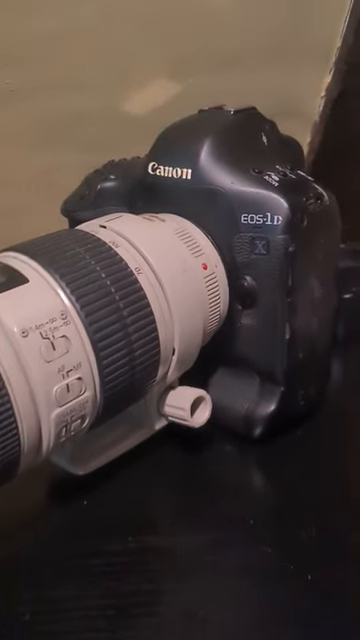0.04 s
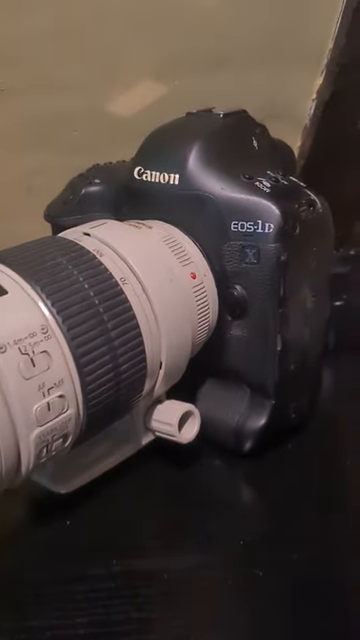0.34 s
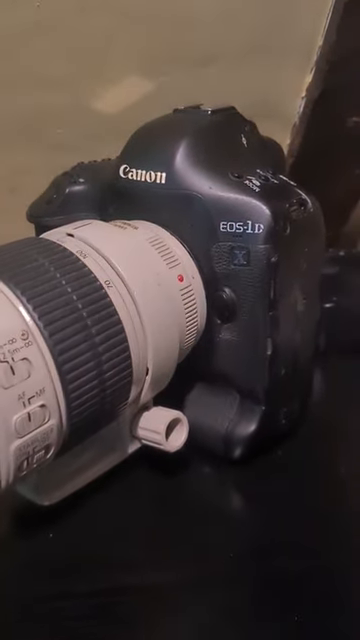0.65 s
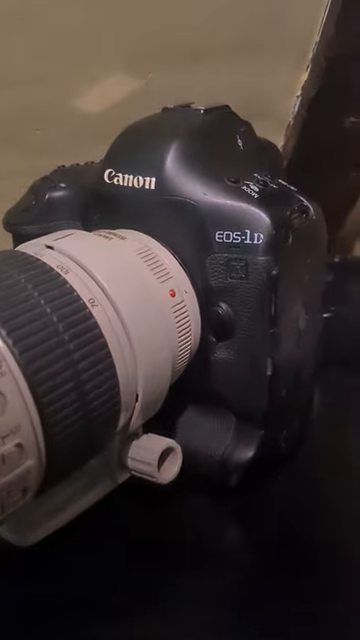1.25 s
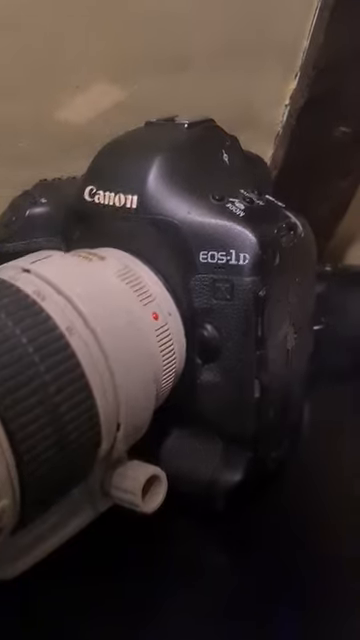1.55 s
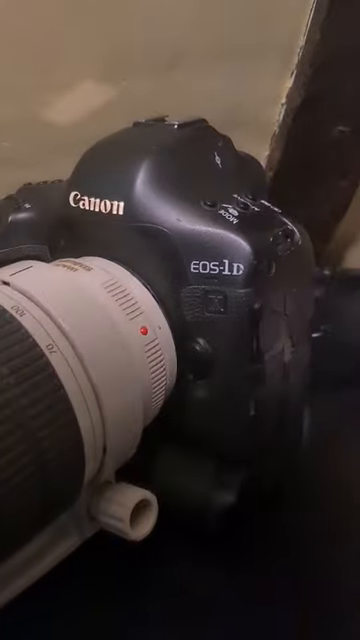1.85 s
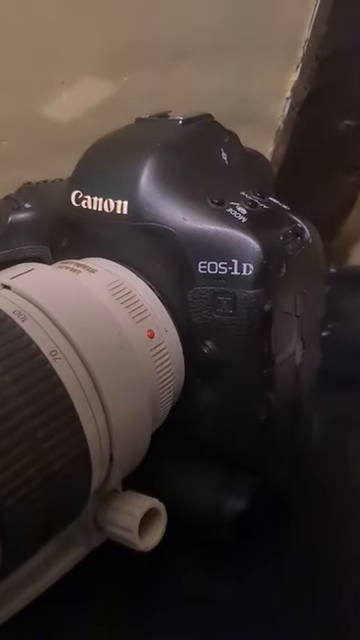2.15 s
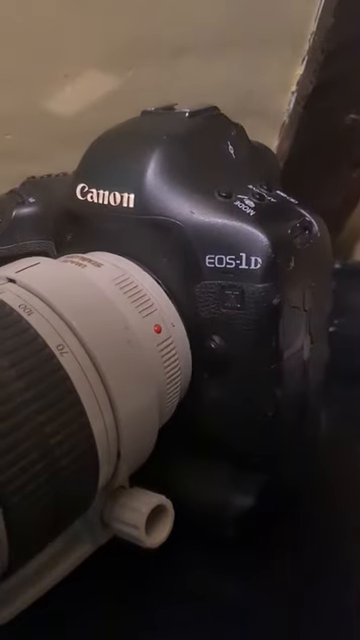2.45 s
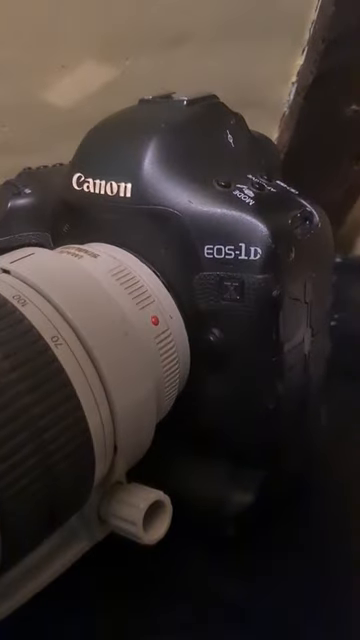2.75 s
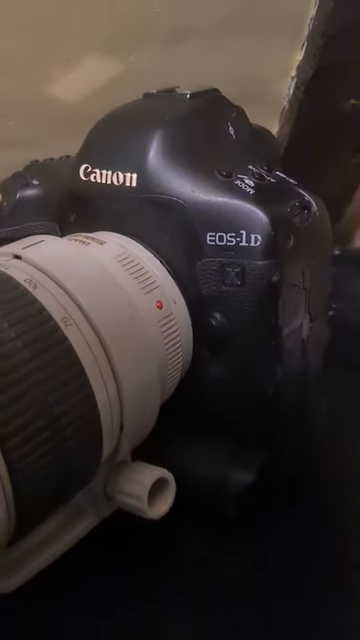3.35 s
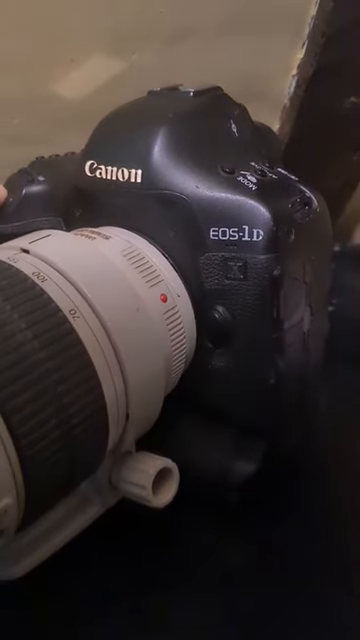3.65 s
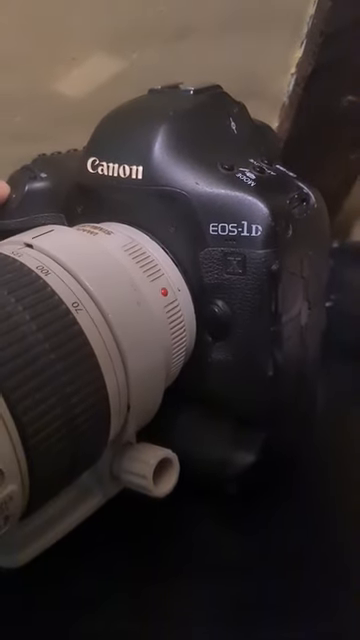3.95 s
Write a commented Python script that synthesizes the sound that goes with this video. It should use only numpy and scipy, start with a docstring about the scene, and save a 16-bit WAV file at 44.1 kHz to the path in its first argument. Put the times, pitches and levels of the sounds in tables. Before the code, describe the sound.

A camera shutter clatters in a rapid continuous burst, close to the microphone. Before it, a quiet room holds only soft ventilation noise and faint hum; then the crisp, evenly spaced clicks run on to the end.

```python
"""Quiet room, ventilation noise and hum. Close by, a reflex camera on a table fires about 10 frames/s.
Each frame is one chain of mirror, shutter and cocking contacts, each a short rattle of the body;
springs and levers ring, and the mirror's weight thumps the body against the table.
Faint handling rustles, a double tick and the release click come first; the first exposure is longer."""
import sys
import numpy as np
from scipy import signal
from scipy.fft import rfft, irfft
from scipy.io import wavfile
from scipy.ndimage import uniform_filter1d

SR = 44100
rng = np.random.default_rng(int(sys.argv[2]) if len(sys.argv) > 2 else 0)


def generate_wav(sig):
    """Save sig (samples, or channels by samples) to the path in sys.argv[1] as 16-bit PCM at SR."""
    pcm = np.round(np.clip(np.atleast_2d(sig).T, -1, 1) * 32767).astype(np.int16)
    wavfile.write(sys.argv[1], SR, pcm)


N = 176400
EVENT_SAMPLES = 8192
FIRST_OPEN_S, FIRST_CLOSE_S = 2.9918, 3.0435
BURST_START_S, FRAME_S, OPEN_TO_CLOSE_S = 3.1268, .09502, .0318

# ventilation noise (frequency [Hz], density [dB])
AIR_SPECTRUM = [(20, -12), (36, -17), (48, 1), (62, -4), (100, -5), (135, 1), (185, -8), (245, -4.5),
                (290, -13), (700, -12), (1000, -18.5), (1400, -18), (2400, -29.5), (5500, -39),
                (6400, -29.5), (7300, -35), (8700, -57.5), (10000, -46), (15000, -46.5)]
# room noise (frequency [Hz], left-right correlation [-1..1])
AIR_CORRELATION = [(60, 0.98), (180, 0.96), (550, 0.34), (1650, -0.12), (4970, 0.21), (15000, 0.1)]
# hum lines (frequency [Hz])
HUM_LINES_HZ = [209.9, 349.9, 845.2]
# hum lines (start level [dB], end level [dB])
HUM_LEVELS_DB = [(-64, -62), (-70, -72.5), (-82, -67)]
# handling rustles (peak time [s], level [dB], 1/e half-width [s])
RUSTLE_SWELLS = [(1.9, -79, .05), (2.1, -78, .12), (2.48, -79, .025), (2.73, -78, .045)]
# friction noise (frequency [Hz], density [dB])
RUSTLE_SPECTRUM = [(1500, -12), (4000, 2), (7000, -14), (12000, -20)]
# camera noise (frequency [Hz], left-right correlation [-1..1])
CAMERA_CORRELATION = [(130, 0.98), (330, -0.13), (600, 0.89), (1200, -0.038), (3000, -0.021),
                      (12000, 0.011)]
# body response (frequency [Hz], density [dB])
BODY_SPECTRUM = [(38, -43), (80, -5.5), (140, -6), (300, -6), (440, -9.5), (600, -4.5), (720, -5),
                 (950, -6.5), (1300, -2), (1600, -3.5), (2100, -1), (2900, 0), (3550, -2), (4400, 0),
                 (5200, -6.5), (7200, -6), (9300, -16.5), (12500, -10.5), (15500, -16)]
# housing resonances (frequency [Hz], boost [dB], width [Hz])
HOUSING_MODES = [(567, 5.5, 58), (786, 6, 28), (842, 5.5, 25), (1072, 7.5, 38), (1222, 5, 49),
                 (1334, 7, 24), (1405, 3.5, 16), (2920, 4.5, 66), (3920, 5.5, 29), (4700, 5, 50),
                 (5810, 4.5, 99), (7060, 3, 83)]
# rattle power common to all frames (frequency [Hz], share [0..1])
REPEAT_SHARE = [(300, 0.96), (700, 0.92), (1300, 0.85), (3500, .65), (7000, 0.42), (13000, .15)]
# rattle balance (frequency [Hz], left over right [dB])
RATTLE_PAN = [(200, 1.5), (380, -8.5), (700, -0.5), (1200, -7), (2400, -2), (4000, -1.8), (5800, -1.5),
              (7700, 3.5), (11000, -.5)]
# room tail at its start (frequency [Hz], relative level [dB])
TAIL_SPECTRUM = [(200, -20), (700, -13.5), (1500, -15), (4000, -15.5), (12000, -21)]
# double tick and release (time [s], level [dB], decay [s], bass [dB], treble [dB])
SINGLE_CLICKS = [(1.934, -65, .006, -10, 9), (1.952, -67, .01, -8, 5), (2.9672, -32, 0.0074, 10.5, 3)]
# small parts rung by those clicks (time [s], pitch [Hz], level [dB], swell [s])
CLICK_PINGS = [(1.934, 6255, -66, .004), (1.934, 4780, -73, .007), (1.949, 6255, -66, 0.0055),
               (2.968, 4200, -43, 0.0047)]
# contacts per frame (name, stroke, delay [s], level [dB], decay [s], bass [dB], treble [dB])
FRAME_CONTACTS = [ ("mirror unlatches", "open", -0.0037, -33.5, .004, 0, 1),
                  ("mirror lifts", "open", 0.0, -12.5, 0.0047, -1.7, -1.3),
                  ("lever rebounds", "open", .007, -21, 0.0088, 0, -5.5),
                  ("mirror lands", "open", .0178, -18.5, 0.0059, 0.89, -1.5),
                  ("shutter unlatches", "close", -.003, -23.5, 0.0045, 0, 0),
                  ("shutter runs", "close", .0003, -13.5, 0.0046, -2, -0.45),
                  ("shutter bounces", "close", .008, -19.5, 0.0043, 0, 5.3),
                  ("gears turn", "close", .0125, -22.5, 0.0087, -1.2, 0.5),
                  ("mirror drops", "close", .0182, -12, 0.0035, 0, 1.8),
                  ("mirror bounces", "close", .0222, -16, 0.0055, -1.8, 6),
                  ("cam turns", "close", .033, -24, 0.013, 0, -2),
                  ("shutter cocks", "close", .0418, -17, 0.0053, -0.44, 0),
                  ("pawl slips", "close", .0465, -22.5, 0.0036, 0, 2.6),
                  ("latch catches", "close", .0505, -18, 0.004, -0.7, -1.5)]
# ringing parts per frame (stroke, delay [s], pitch [Hz], level [dB], swell [s], left over right [dB])
FRAME_RINGS = [ ("open", -.0012, 580, -26.5, 0.0031, 0), ("open", 0.0, 3911, -22, 0.0016, 8.2),
               ("open", .0006, 3040, -28, 0.0015, -1), ("open", .0007, 2650, -27.5, 0.001, 8),
               ("open", 0.0031, 221, -24.5, 0.0021, 1), ("open", .0172, 1400, -31, 0.0052, 1),
               ("open", 0.01746, 221.6, -20.5, 0.0034, 2.8), ("open", .0178, 772, -24, 0.0015, -6),
               ("open", .0197, 331, -29, 0.009, -9), ("open", 0.0214, 81, -31.5, 0.0053, 0),
               ("open", .0352, 157, -21.5, 0.002, 1), ("close", -0.000077, 1316, -23, 0.0021, -14.5),
               ("close", 0.0, 3323, -25, 0.0019, -17.5), ("close", -.0005, 2941, -28.5, 0.0041, -13),
               ("close", 0.0, 4735, -27.5, 0.0032, 0), ("close", .0176, 4700, -26, .0018, -2),
               ("close", .0183, 816, -26, 0.0022, 0), ("close", .051, 1234, -27, 0.0039, -13.5),
               ("close", .0421, 2010, -25, 0.0018, -10.5), ("close", .0475, 221, -28.5, 0.0039, 1),
               ("close", .0507, 1075, -33.5, 0.007, -15)]


def from_db(db):
    return 10 ** (np.asarray(db) / 20)


def rms_one(x):
    return x / np.sqrt(np.mean(x ** 2) + 1e-20)


def at_bins(points, size):
    """Table interpolated over log frequency at the FFT bins."""
    hz, value = np.transpose(points)
    return np.interp(np.log(np.fft.rfftfreq(size, 1 / SR) + 1), np.log(hz), value)


def pan(db):
    return from_db(np.array([[.5], [-.5]]) * db)


def highpass(x, hz):
    return signal.sosfilt(signal.butter(2, hz, "high", fs=SR, output="sos"), x)


def minimum_phase(gain):
    """Causal filter spectrum with this gain."""
    cepstrum = irfft(np.log(gain + 1e-12))
    size = cepstrum.shape[-1]
    fold = 1 + np.sign(size / 2 - np.arange(size)) - (np.arange(size) == 0)
    return np.exp(rfft(cepstrum * fold))


def stereo_noise(correlation, count, size):
    """White noise spectra with the given left-right correlation."""
    alike = np.clip(at_bins(correlation, size), -.99, .99)
    mid, side = rfft(rng.standard_normal((2, count, 1, size)))
    return (np.sqrt(1 + alike) * mid + np.sqrt(1 - alike) * side * [[1], [-1]]) / np.sqrt(2)


def drift(hz):
    """Slow random curve through unit-variance knots."""
    knots = rng.standard_normal(int(N / SR * 100))
    return np.interp(np.arange(N) / SR * hz, np.arange(len(knots)), knots)


def add(out, time_s, sound):
    start = int(time_s * SR)
    if start < N:
        out[:, start:start + sound.shape[-1]] += sound[..., :N - start]


def ventilation(air_db=-55, hiss_db=-87, hiss_hz=6380, half_width_hz=120):
    """Dull air noise with a thin band of hiss."""
    air_noise, hiss_noise = stereo_noise(AIR_CORRELATION, count=2, size=N)
    air = rms_one(irfft(air_noise * from_db(at_bins(AIR_SPECTRUM, N))))
    detuning = (np.fft.rfftfreq(N, 1 / SR) - hiss_hz) / half_width_hz
    hiss = rms_one(irfft(hiss_noise / (1 + detuning ** 2)))
    return from_db(air_db) * air + from_db(hiss_db) * hiss


def hum(waver=.28, waver_hz=5.85):
    """Three tones wavering in level and phase."""
    t, out = np.arange(N) / SR, np.zeros(N)
    for hz, (start_db, end_db) in zip(HUM_LINES_HZ, HUM_LEVELS_DB):
        amplitude = 1 + waver * drift(waver_hz)
        phase_rad = 2 * np.pi * hz * t + waver * drift(waver_hz)
        out += from_db(np.linspace(start_db, end_db, N)) * rms_one(amplitude * np.sin(phase_rad))
    return out


def rustles():
    """Handling: faint swells of friction noise."""
    t = np.arange(N) / SR
    swells = sum(from_db(level_db) * np.exp(-((t - peak_s) / half_width_s) ** 2)
                 for peak_s, level_db, half_width_s in RUSTLE_SWELLS)
    noise = stereo_noise(CAMERA_CORRELATION, count=1, size=N)[0]
    return swells * rms_one(irfft(noise * from_db(at_bins(RUSTLE_SPECTRUM, N))))


def body_response(bass_db, treble_db):
    """Stereo gain of the body and its housing modes, tilted per contact."""
    bins_hz = np.fft.rfftfreq(EVENT_SAMPLES, 1 / SR)
    housing = 1 + sum((from_db(boost_db) - 1) / (1 + 2j * (bins_hz - hz) / width_hz)
                      for hz, boost_db, width_hz in HOUSING_MODES)
    body = rms_one(from_db(at_bins(BODY_SPECTRUM, EVENT_SAMPLES)) * np.abs(housing))
    tilt_db = at_bins([(590, bass_db), (3020, 0), (9300, treble_db)], EVENT_SAMPLES)
    return body * from_db(tilt_db) * pan(at_bins(RATTLE_PAN, EVENT_SAMPLES))


def rattles(level_db, decay_s, bass_db, treble_db, count, attack_s, hold_s=.0012, room_t60_s=.24):
    """Repeats of one contact: dense, fast-dying body modes plus room tail. Treble varies most."""
    t = np.arange(EVENT_SAMPLES) / SR
    noise = stereo_noise(CAMERA_CORRELATION, count + 1, EVENT_SAMPLES)
    share = at_bins(REPEAT_SHARE, EVENT_SAMPLES)
    modes = np.sqrt(share) * noise[0] + np.sqrt(1 - share) * noise[1:]
    envelope = (1 - np.exp(-t / attack_s)) * np.exp(-np.maximum(t - hold_s, 0) / decay_s)
    direct = rfft(irfft(modes) * envelope)
    power = uniform_filter1d(np.mean(np.abs(direct) ** 2, axis=0), size=90) / np.sum(envelope ** 2)
    direct *= minimum_phase(power ** -.5)   # flattens chance peaks
    tail_noise = irfft(modes * from_db(at_bins(TAIL_SPECTRUM, EVENT_SAMPLES)))[..., ::-1]
    tail = tail_noise * (1 - np.exp(-t / decay_s)) * from_db(-60 * t / room_t60_s)
    gain = from_db(level_db) * body_response(bass_db, treble_db)
    return irfft((direct + rfft(tail)) * minimum_phase(gain))


def ring(hz, level_db, swell_s):
    """One mode; peaks at swell_s, then dies."""
    t = np.arange(EVENT_SAMPLES) / SR
    envelope = t / swell_s * np.exp(1 - t / swell_s)
    return from_db(level_db) * envelope * np.sin(2 * np.pi * hz * t)


def clicks():
    """Faint double tick, then the release; small parts ping with them."""
    out = np.zeros((2, N))
    for time_s, level_db, decay_s, bass_db, treble_db in SINGLE_CLICKS:
        add(out, time_s, rattles(level_db, decay_s, bass_db, treble_db, count=1, attack_s=.00086)[0])
    for time_s, hz, level_db, swell_s in CLICK_PINGS:
        add(out, time_s, ring(hz, level_db, swell_s))
    return out


def stroke_times_s(stroke):
    """Opening or closing strokes: first frame, then the steady run."""
    run_s = BURST_START_S + FRAME_S * np.arange(int((N / SR - BURST_START_S) / FRAME_S) + 1)
    if stroke == "open":
        return np.r_[FIRST_OPEN_S, run_s]
    return np.r_[FIRST_CLOSE_S, run_s + OPEN_TO_CLOSE_S]


def clatter(first_frame_db=1.8, spread_db=.8, jitter_s=.00005):
    """Mirror, shutter and cocking contacts strike the body; the first frame a little harder."""
    out = np.zeros((2, N))
    for _, stroke, delay_s, level_db, decay_s, bass_db, treble_db in FRAME_CONTACTS:
        times_s = stroke_times_s(stroke)
        hits = rattles(level_db, decay_s, bass_db, treble_db, count=len(times_s), attack_s=.00018)
        for time_s, hit in zip(times_s, hits):
            force_db = first_frame_db * (time_s < BURST_START_S) + spread_db * rng.normal()
            add(out, time_s + delay_s + jitter_s * rng.normal(), hit * from_db(force_db))
    return out


def rings_and_thumps(spread_db=1.0, jitter_s=.00018):
    """Springs and levers ring; the mirror's weight thumps the body against the table."""
    out = np.zeros((2, N))
    for stroke, delay_s, hz, level_db, swell_s, pan_db in FRAME_RINGS:
        sound = pan(pan_db) * ring(hz, level_db, swell_s)
        for time_s in stroke_times_s(stroke):
            onset_s = time_s + delay_s + jitter_s * rng.normal()
            add(out, onset_s, sound * from_db(spread_db * rng.normal()))
    return highpass(out, hz=56)   # rings and thumps keep little deep bass below about 56 Hz


def scene():
    """Camera over room noise."""
    camera = rings_and_thumps() + clatter() + clicks() + rustles()
    return camera + (ventilation() + hum()) * pan(db=-1.2)


def record(dry, low_cut_hz=30, stopband_hz=16600, ceiling=1.5):
    """Low cut, soft clip, steep top cut."""
    rounded = ceiling * np.tanh(highpass(dry, low_cut_hz) / ceiling)
    return signal.sosfilt(signal.cheby2(16, 70, stopband_hz, fs=SR, output="sos"), rounded)


dry = scene()
out = record(dry)
generate_wav(out)
```